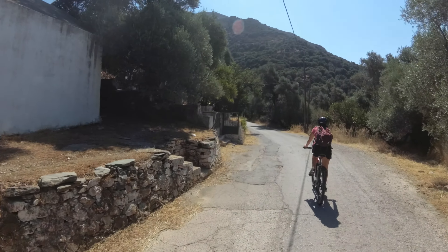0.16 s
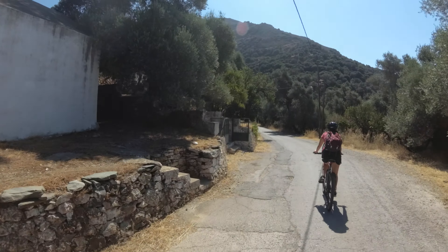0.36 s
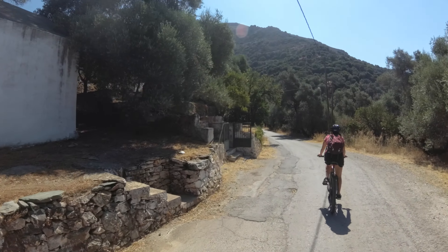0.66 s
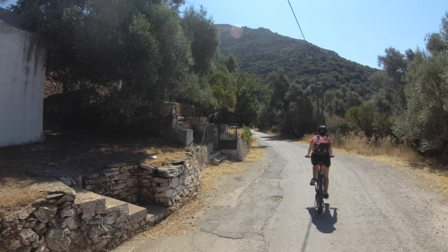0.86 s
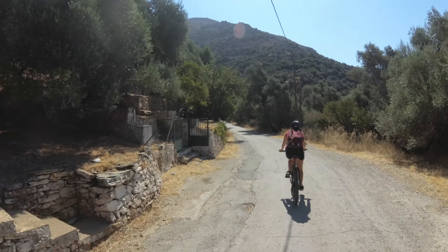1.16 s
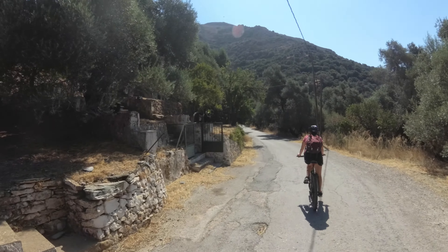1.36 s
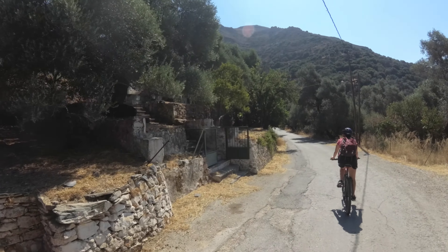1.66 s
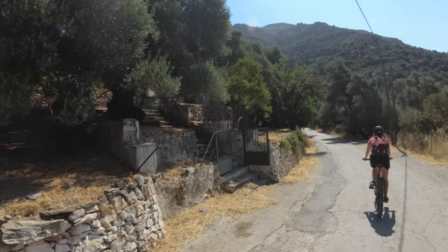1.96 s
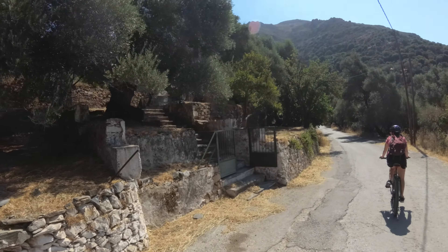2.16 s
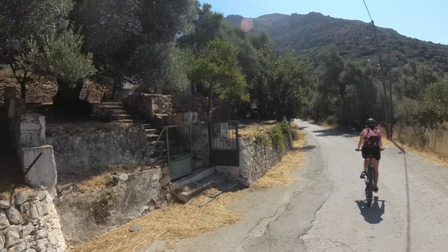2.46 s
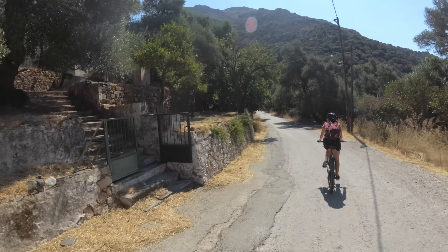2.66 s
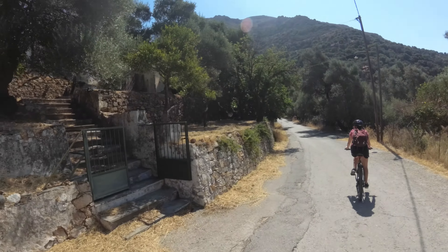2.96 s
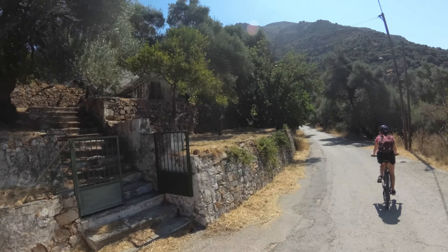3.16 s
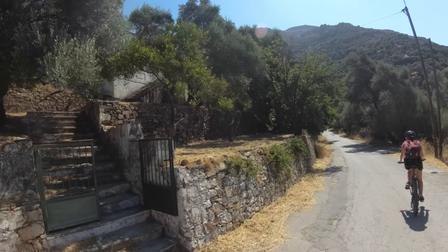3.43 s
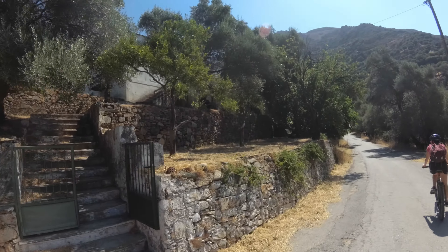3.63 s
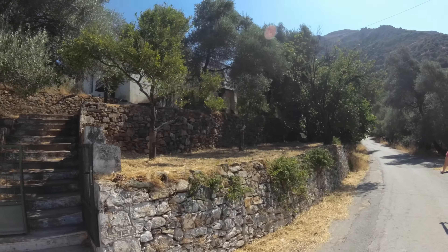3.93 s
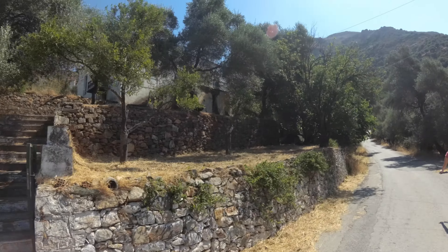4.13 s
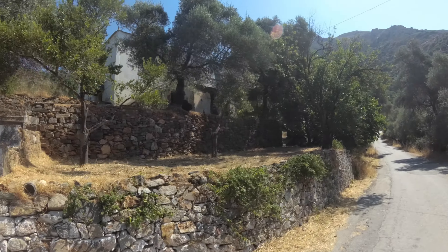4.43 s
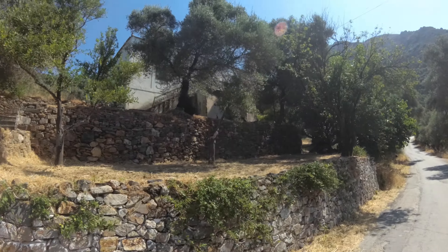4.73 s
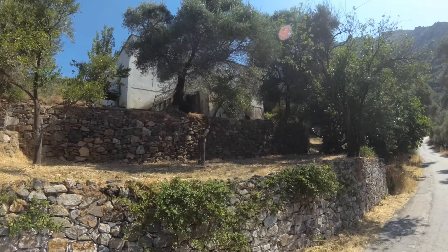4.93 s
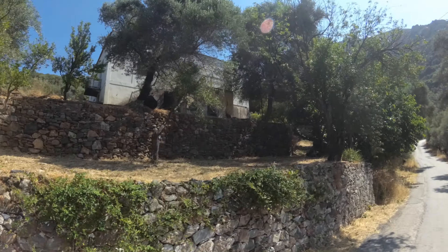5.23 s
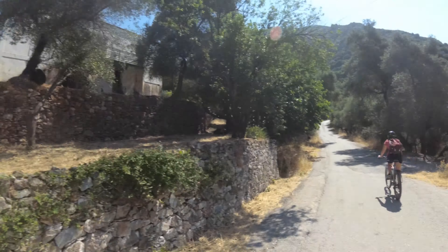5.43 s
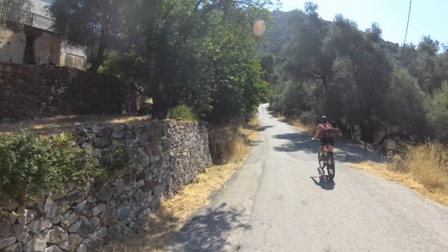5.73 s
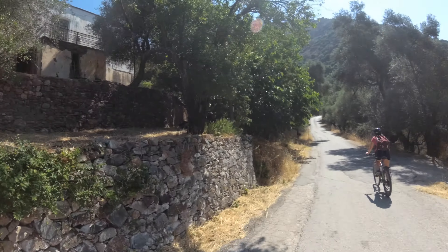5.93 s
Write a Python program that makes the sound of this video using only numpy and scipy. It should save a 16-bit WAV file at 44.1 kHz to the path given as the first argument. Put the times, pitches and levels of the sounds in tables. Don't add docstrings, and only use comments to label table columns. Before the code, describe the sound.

A small camera on a bicycle rides over rough asphalt. Its loose plastic mount snaps, knocks and thuds at uneven intervals, with brief scrapes and a faint low shaking underneath. The loudest crack comes at about two seconds, and a dense clatter just before five. Around it a wide, steady, high cicada chorus shimmers in open air, slowly growing. The blows are close and nearly central, conducted through the housing.

```python
import sys
import numpy as np
from scipy import signal
from scipy.fft import rfft, irfft, next_fast_len
from scipy.io import wavfile
from scipy.ndimage import uniform_filter1d, map_coordinates

SR = 44100
rng = np.random.default_rng(int(sys.argv[2]) if len(sys.argv) > 2 else 0)


def log_audio(samples):
    frames = np.atleast_2d(samples).T
    limited = np.clip(frames, -1, 1)
    pcm = np.round(limited * 32767).astype(np.int16)
    wavfile.write(sys.argv[1], SR, pcm)


def nominal_scale(level):
    x = np.asarray(level, float) / 20
    return 10 ** x


N = 268569

# [t/s, peak level/dB]
SNAP_EVENTS = [(0.063, -15), (0.4314, -19), (1.1605, -10.5), (1.3276, -8.5), (1.52, -28), (1.672, -8.5),
               (2.0149, 0.5), (2.5671, -29), (3.1326, -17.5), (3.499, -8.5), (4.0855, -19), (4.7702, -27.5),
               (4.8978, -2.0), (5.2042, -1.5)]
# [t/s, peak level/dB, brightness/dB, thud level/dB]
KNOCK_EVENTS = [(0.0992, -31.5, -13, -25.5), (0.263, -41, -4, -37), (0.815, -41, -12, -39),
                (0.9, -39, -15, -38), (1.197, -28, -14, -28), (1.6453, -37, -15, -30),
                (1.709, -25, -13, -18), (1.7374, -28, -22.5, -6.5), (1.767, -16.5, -17, -19.5),
                (2.0213, -2, -3, -9.5), (2.0619, -26, -15, -17), (2.1309, -13.5, -13.5, -20),
                (2.254, -36, -8, -35), (2.672, -13.5, -15, -24), (2.866, -43, -4, -33.5),
                (2.971, -36.5, -5, -32.5), (3.0437, -33, -22, -40), (3.6631, -19.5, -22.5, -32),
                (3.6779, -38, -17, -8), (3.7045, -19, -13.5, -24), (4.645, -38, -4, -34),
                (4.7845, -31, -16, -44), (4.8138, -26, -21, -4), (4.8606, -14.5, -11, -13),
                (4.8684, -14, -13, -32), (4.8788, -8.5, -18, -11.5), (5.1747, -14, -13.5, -18.5),
                (5.1952, -24, -25, -21), (5.225, -31, -14, -21), (5.617, -19, -24, -26.5)]
# [f/Hz, width/Hz, level/dB]
SPRING_MODE = (205, 40, 0)
# [f/Hz, width/Hz, level/dB]
ARM_MODES = [(325, 25, -10.5), (424, 35, -5), (537, 52, -5)]
# [f/Hz, width/Hz, level/dB]
SHELL_MODES = [(764, 168, 6), (935, 100, 4), (1168, 134, 0), (1550, 167, -2)]
# [f/Hz, width/Hz, level/dB]
RIM_MODES = [(1750, 112, 4), (2352, 194, 4.5), (2570, 212, 0), (2960, 470, 5.5), (3534, 490, -1.5)]

ROUGH_DB = -48


def unit(x):
    return x / np.sqrt(np.mean(x ** 2) + 1e-20)


def along(points, hz):
    f, v = np.transpose(points)
    return np.interp(np.log(hz + 1), np.log(f + 1), v)


def curves(rows):
    s, *cols = np.transpose(rows)
    return [np.interp(np.arange(N) / SR, s, c) for c in cols]


def wobble(rate):
    at = np.arange(0, N + 32, 32)
    knots = rng.standard_normal(int(N * rate / SR) + 4)
    return np.interp(np.arange(N), at, map_coordinates(knots, [at * rate / SR]))


def filtered(x, response):
    m = next_fast_len(N + SR // 2)
    return irfft(rfft(x, m) * response(np.fft.rfftfreq(m, 1 / SR)), m)[..., :N]


def modes(table):
    def response(f):
        total = 0
        for k, (c, w, db) in enumerate(table):
            total = total + (-1) ** k * nominal_scale(db) * SR / np.pi * 1j * f / (c * c - f * f + 1j * f * w)
        return total
    return response


def swing(table):
    return lambda f: sum(share * SR / np.pi * c / (c * c - f * f + 1j * f * w) for c, w, share in table)


def soft(f, contact_s):
    return 1 / (1 + 1j * f * contact_s) ** 4


def blows(times, db):
    return np.bincount(np.round(np.asarray(times) * SR).astype(int), nominal_scale(db), N)[:N]


def lean(x, table):
    return filtered(x, lambda f: nominal_scale(along(table, f) * np.array([[.5], [-.5]])))


def pair(alike):
    a, b = rng.standard_normal((2, N))
    turn = np.arccos(np.clip(alike, 0, 1)) / 2
    return np.cos(turn) * a + np.sin(turn) * np.array([b, -b])


def steady(x):
    return x / np.sqrt(np.abs(uniform_filter1d(np.mean(x ** 2, 0), size=1600)) + 1e-20)


def chatter(alike, rate, spread_db, clump_db):
    sizes = nominal_scale(spread_db * rng.exponential(size=N).clip(0, 4)) * (rng.random(N) < rate / SR)
    grit = unit(np.convolve(sizes, np.hanning(40), "same"))
    return pair(alike) * (1.08 + grit) * nominal_scale(clump_db * wobble(30))


def chorus():
    # [t/s, level/dB]
    main_swell = [(0.0, -49), (0.12, -43), (0.42, -50.5), (1.07, -48.5), (1.75, -49), (2.27, -48.5),
                  (2.61, -47), (3.07, -48.5), (3.39, -48.5), (3.9, -48), (4.25, -46), (4.38, -49),
                  (4.66, -46), (4.8, -49.5), (5.02, -45.5), (5.5, -46.5), (5.78, -44.5), (6.09, -46.5)]
    main_db, = curves(main_swell)
    t, swell = np.arange(N) / SR, main_db - main_db.mean()
    low_db = -55.5 + 0.89 * t + 0.13 * swell + 1.4 * wobble(3.08)
    high_db = -57.5 + 1.42 * t + 0.22 * swell + 0.87 * wobble(3.15)
    return main_db, low_db, high_db


def singers(tymbal, alike, clicks_hz, depth):
    beat = 0
    for k in range(3):
        rate_hz = clicks_hz * nominal_scale(0.86 * wobble(3) + 1.5 * k)
        beat = beat + np.cos(2 * np.pi * np.cumsum(rate_hz) / SR)
    drive = pair(alike) * nominal_scale(depth * beat + 1.06 * wobble(20) + 0.62 * wobble(4.99))
    return unit(filtered(drive, lambda f: np.abs(modes(tymbal)(f)) ** 1.305))


def cicadas():
    # [f/Hz, width/Hz, level/dB]
    main_tymbal = [(5177, 463, 0)]
    low_tymbal = [(2645, 264, 0)]
    high_tymbal = [(6455, 620, 1.5), (7860, 620, -1.5)]
    far_tymbal = [(9540, 710, 2.5), (12300, 300, -4), (13840, 490, -5.5), (14800, 590, 0)]
    # [f/Hz, level per Hz/dB]
    air_spectrum = [(300, -3), (1000, -7.5), (1550, -1), (2000, -8), (3500, -2), (4200, -12), (6000, -4.5),
                    (8500, -9.5), (11000, -14.5), (13300, -22.5), (15500, -41)]
    main_db, low_db, high_db = chorus()
    main = nominal_scale(main_db + 2.0) * singers(main_tymbal, 0.22, clicks_hz=113.3, depth=0.54)
    low = nominal_scale(low_db - 0.85) * singers(low_tymbal, 0.41, clicks_hz=93.0, depth=0.4)
    high = nominal_scale(high_db - 0.14) * singers(high_tymbal, 0.49, clicks_hz=114.3, depth=0.43)
    far = nominal_scale(-55.0) * singers(far_tymbal, 0.48, clicks_hz=126, depth=0.53)
    air = nominal_scale(-51) * unit(filtered(pair(0.52), lambda f: nominal_scale(along(air_spectrum, f))))
    return main + low + high + far + air


def jolts(grows, rise, fall):
    # [t/s, jolt level/dB]
    bumps = [(0.07, -39), (0.44, -46), (1.19, -46.5), (1.34, -40), (1.53, -52), (1.68, -42.5), (1.75, -39),
             (2.03, -39), (2.18, -40.5), (2.63, -41.5), (3.03, -54), (3.14, -39.5), (3.49, -44),
             (3.68, -38), (3.83, -53), (3.99, -54), (4.09, -44), (4.83, -30.5), (4.89, -27.5), (5.16, -40),
             (5.22, -35.5), (5.57, -50)]
    t = np.arange(0, N, 64) / SR
    s, db = np.transpose(bumps)[..., None]
    slope_db = np.where(t < s, rise * (s - t), fall * (t - s))
    gain = nominal_scale(ROUGH_DB + grows * (db - ROUGH_DB) - slope_db).max(0)
    return np.interp(np.arange(N) / SR, t, gain)


def shaking():
    # [t/s, roughness level/dB]
    road = [(0.0, -54), (0.22, -52), (1.12, -52.5), (1.58, -51), (1.73, -61), (2.02, -51.5), (2.15, -48),
            (2.34, -51), (2.92, -51), (3.19, -50), (4.41, -46.5), (5.02, -48.5), (5.22, -46.5), (6.09, -41)]
    road_db, = curves(road)
    level = lambda grows, db: nominal_scale(ROUGH_DB + db + grows * (road_db - ROUGH_DB))
    rattle = jolts(0.67, rise=158, fall=107)
    mount = level(0.9, -1) + nominal_scale(-6.0) * rattle
    shell = level(0.38, -6.5) + nominal_scale(-10.5) * rattle
    sway = level(1.0, -11.5) + jolts(1, rise=303, fall=260)
    return 20 * np.log10((mount, shell, sway))


def spring(f):
    c, w, db = SPRING_MODE
    recoil = -nominal_scale(db) * SR / np.pi * c / (c * c - f * f + 1j * f * w)
    return recoil * (1j * f / (50 + 1j * f)) ** 2


def shake():
    # [f/Hz, level per Hz/dB]
    sway_spectrum = [(12, -28), (25, -1), (40, -3.5), (80, -1), (120, -2.5), (160, 0), (300, -120)]
    mount_db, shell_db, sway_db = shaking()
    mount_body = lambda f: (spring(f) + nominal_scale(-1.5) * modes(ARM_MODES)(f)) * soft(f, 0.0004)
    shell_body = lambda f: modes(SHELL_MODES)(f) + nominal_scale(-11.5) * modes(RIM_MODES)(f)
    mount = filtered(chatter(0.96, rate=600, spread_db=-1.5, clump_db=3.5), mount_body)
    shell = filtered(chatter(1.0, rate=800, spread_db=2.5, clump_db=3.0), shell_body)
    sway = filtered(pair(1.0), lambda f: nominal_scale(along(sway_spectrum, f)))
    rattling = nominal_scale(mount_db) * unit(mount) + nominal_scale(shell_db + 0.5) * unit(shell)
    return rattling + nominal_scale(sway_db + 3.1 * wobble(19)) * steady(sway)


def all_scrapes():
    # [start t/s, length/s, rms level/dB, brightness/dB]
    slides = [(0.086, 0.095, -44.5, -18), (1.34, 0.076, -47, -14), (1.468, 0.047, -39.5, -12),
              (1.631, 0.03, -39, -20), (1.729, 0.053, -29, -17), (1.782, 0.04, -42.5, -13),
              (2.035, 0.07, -33, -19), (2.086, 0.046, -28, -12), (2.136, 0.074, -37.5, -14),
              (2.208, 0.074, -42.5, -31), (2.604, 0.053, -36.5, -13.5), (2.668, .03, -34.5, -19),
              (3.032, 0.051, -37.5, -22), (3.189, 0.028, -39.5, -26), (3.666, 0.08, -34.5, -23),
              (3.776, 0.088, -41, -21), (4.25, .05, -51, -20.5), (4.804, 0.022, -28, -17),
              (4.821, 0.042, -26, -15), (4.858, 0.04, -23, -17), (4.899, 0.033, -32.5, -14),
              (4.937, 0.03, -30, -16.5), (5.132, 0.059, -31, -12.5), (5.185, 0.035, -28, -21),
              (5.239, 0.033, -33, -16), (5.395, 0.062, -42, -13), (5.53, 0.054, -44.5, -12),
              (5.65, 0.053, -46, -20.5)]
    settling = [(s - 0.0092, 0.047, -35.5 + 0.25 * db, -20) for s, db in SNAP_EVENTS]
    return slides + settling


def scrapes():
    dull, bright = np.zeros(N), np.zeros(N)
    for s, length, db, bright_db in all_scrapes():
        stroke = np.sin(np.pi * np.linspace(0, 1, round(length * SR)) ** 0.68).clip(0) ** 1.21
        dull[round(s * SR):][:len(stroke)] += nominal_scale(db) * stroke
        bright[round(s * SR):][:len(stroke)] += nominal_scale(db + bright_db) * stroke
    grit = chatter(0.92, rate=1200, spread_db=3.5, clump_db=3.5)
    body = filtered(grit, lambda f: modes(SHELL_MODES)(f) + nominal_scale(6.0) * modes(ARM_MODES)(f))
    return dull * steady(body) + bright * steady(filtered(grit, modes(RIM_MODES)))


def all_thuds():
    # [t/s, peak level/dB, hardness/dB]
    lone = [(0.4128, -33, -20), (0.4456, -32, -17), (1.0005, -36.5, 2), (1.3689, -35, 7),
            (1.4691, -30.5, -8), (1.5369, -37, 7.5), (2.079, -8.5, -8.5), (2.1024, -21, -19),
            (2.1763, -25.5, -18), (2.5817, -27.5, -9), (2.6333, -32, -5), (3.015, -28.5, -16),
            (3.0478, -17.5, -8.5), (3.346, -31, -10), (3.516, -30, -12), (3.5714, -31, -11),
            (3.818, -30, -12), (3.9829, -27, -11.5), (4.4863, -33.5, -11), (4.8368, -9, -12),
            (4.9212, -19.5, -20), (5.1373, -12, -9), (5.2452, -28, -29), (5.434, -29.5, -11),
            (5.5717, -26, -16), (5.7223, -28.5, -11), (5.7722, -34.5, 3), (5.909, -31.5, -1),
            (6.0337, -29, -15), (6.08, -28.5, -16)]
    knocked = [(s - 0.00031, thud_db, -7.5) for s, _, _, thud_db in KNOCK_EVENTS]
    snapped = [(s - 0.0012, -12 + 0.85 * db, -12) for s, db in SNAP_EVENTS]
    return lone + knocked + snapped


def thuds():
    # [f/Hz, width/Hz, signed share]
    mount_masses = [(202, 38, -.585), (304, 61, -.236), (365, 209, 1.195), (794, 129, .307)]
    s, db, hard_db = np.transpose(all_thuds())
    force = nominal_scale(db + 0.5)
    hard = nominal_scale(hard_db + 5.0)
    full = np.clip(hard, 0, 1)
    at = lambda share: blows(s, 20 * np.log10(force * share + 1e-9))
    contact = lambda f: soft(f, .00085)
    whole = filtered(at(full), lambda f: swing(mount_masses)(f) * contact(f))
    hum = filtered(at(1 - full), lambda f: -.6 * modes([SPRING_MODE])(f) * soft(f, 0.0013))
    arm = filtered(at(hard - full), lambda f: 0.53 * modes(ARM_MODES)(f) * contact(f))
    return whole + hum + arm


def snaps():
    clip_masses = [(1039, 244, .32), (1629, 296, -1.62), (2553, 80, 1.3), (2738, 155, .88)]
    s, db = np.transpose(SNAP_EVENTS)

    def body(f):
        edge = soft(f, .00064)
        flat = 4 * soft(f, .00097) * np.exp(-2j * np.pi * f * .00095)
        case = modes(RIM_MODES)(f) + modes(SHELL_MODES)(f)
        return (edge + flat) * swing(clip_masses)(f) + nominal_scale(-26) * case

    return filtered(blows(s, db - 3.5), body) * nominal_scale([[-2.5], [0]])


def knocks():
    s, db, bright_db, _ = np.transpose(KNOCK_EVENTS)
    t = np.arange(SR // 20) / SR
    ragged = rng.standard_normal((len(s), 2, len(t))) * nominal_scale(-60 * t / .007)
    ragged[..., 0] += 5
    ragged[:, 1] = 0.85 * ragged[:, 0] + 0.33 * ragged[:, 1]
    force, f = rfft(ragged), np.fft.rfftfreq(len(t), 1 / SR)
    at = (np.round(s * SR).astype(int)[:, None] + np.arange(len(t))).ravel()

    def ring(response, peak_db):
        rows = irfft(force * response, len(t))
        rows *= (nominal_scale(peak_db) / np.abs(rows).max((1, 2)))[:, None, None]
        return np.array([np.bincount(at, rows[:, c].ravel(), N)[:N] for c in range(2)])

    shell_body = modes(SHELL_MODES)(f) + nominal_scale(-3) * modes(ARM_MODES[2:])(f)
    airborne = (1j * f / (4000 + 1j * f)) ** 2 / (1 + 1j * f / 7000)
    shell = ring(shell_body * soft(f, .0001), db - 1.5)
    rim = ring(modes(RIM_MODES)(f) * soft(f, .00008), db + bright_db + 3.0)
    return shell + rim + ring(airborne, 2 * db + 3 * bright_db - 11.0)


def crack():
    t = np.arange(N) / SR - 2.0224
    spit = pair(.9) * (t > 0) * nominal_scale(-8 - 60 * t.clip(0) / 0.0046)
    return filtered(spit, lambda f: (1j * f / (3000 + 1j * f)) ** 2 / (1 + 1j * f / 4000))


def housing(f):
    # [f/Hz, level/dB]
    plastic_lean = [(30, .3), (200, 1), (380, -2), (700, -1.5), (1290, -4), (2380, -2.5), (4400, -3.5),
                    (8000, -1)]
    top = 1j * f / 3520
    carried = 1j * f / (31.7 + 1j * f) / (1 + .5 * top + top ** 2)
    return carried * nominal_scale(along(plastic_lean, f) * np.array([[.5], [-.5]]))


def scene():
    # [f/Hz, level/dB]
    trees_lean = [(2000, -1), (5000, -4.5), (8000, -5.5), (15000, 0.5)]
    left, right = filtered(thuds() + snaps() + knocks() + scrapes() + shake(), housing)
    return np.array([np.roll(left, 1), right]) + crack() + lean(cicadas(), trees_lean)


def gate(x):
    # [f/Hz, share of the time]
    dropped = [(3500, 0), (4200, .06), (4600, 0), (7800, .02), (8600, .1), (9500, .03), (11200, .15),
               (12200, .06), (13600, .3), (14600, .12), (15400, .1)]
    hz, _, z = signal.stft(x, SR, nperseg=1024)
    width = 8
    power = np.sum(np.abs(z[:, :-1]) ** 2, 0).reshape(512 // width, width, -1).sum(1)
    level = uniform_filter1d(np.log(power + 1e-20), size=5, axis=1)
    dip = level - uniform_filter1d(level, size=50, axis=1)
    dip = dip - uniform_filter1d(dip, size=7, axis=0)
    rank = dip.argsort(1).argsort(1) / dip.shape[1]
    keep = np.repeat(rank >= along(dropped, hz[width // 2::width])[:, None], width, axis=0)
    return signal.istft(z * np.pad(keep, ((0, 1), (0, 0))), SR, nperseg=1024)[1][:, :N]


def band_limit(x):
    return signal.sosfilt(signal.butter(12, 15740, fs=SR, output="sos"), x)


def record(dry):
    # [f/Hz, side level/dB]
    side_width = [(6000, 2), (6500, -12), (11000, -1), (13000, 0), (15500, 5.5)]
    left, right = gate(dry)
    mid, side = (left + right) / 2, (left - right) / 2
    side = filtered(side, lambda f: nominal_scale(along(side_width, f)))
    clipped = np.clip(np.array([mid + side, mid - side]), -1, 1)
    finished = filtered(clipped, lambda f: f < 15480)
    return band_limit(finished)


dry = scene()
out = record(dry)
log_audio(out)
```